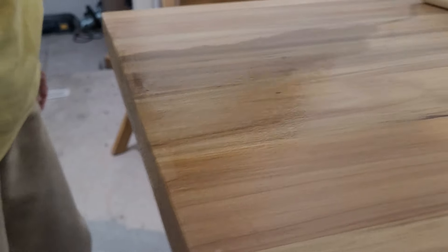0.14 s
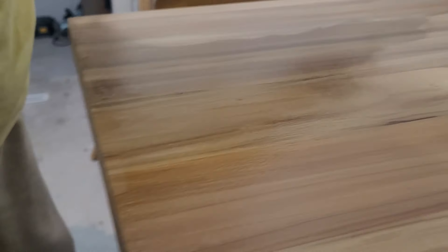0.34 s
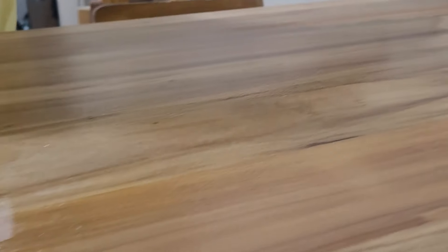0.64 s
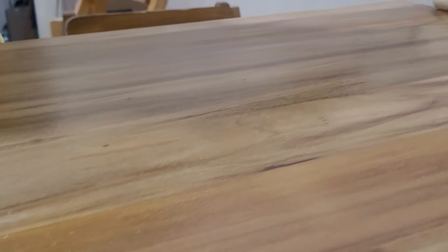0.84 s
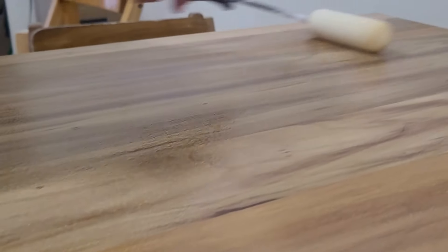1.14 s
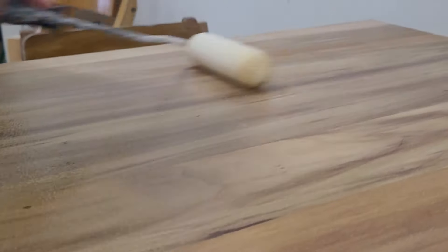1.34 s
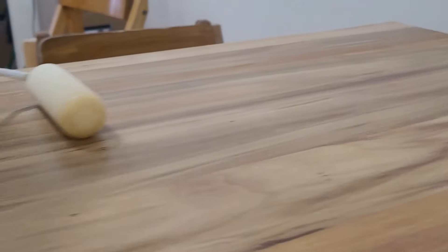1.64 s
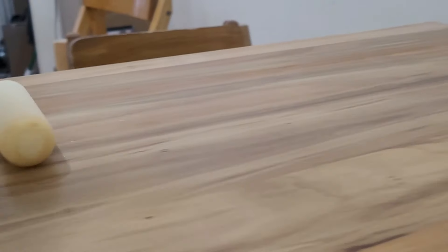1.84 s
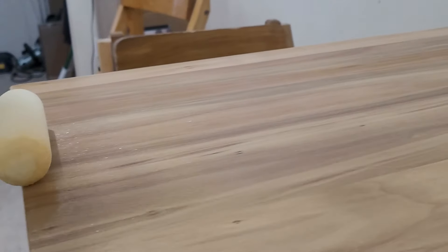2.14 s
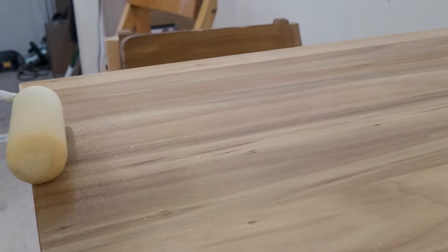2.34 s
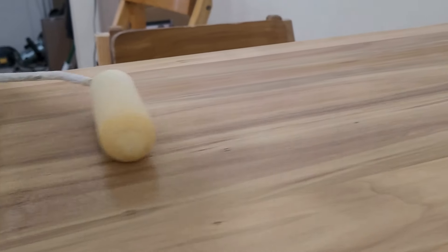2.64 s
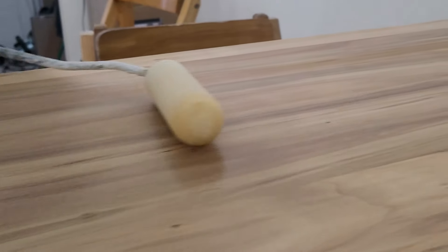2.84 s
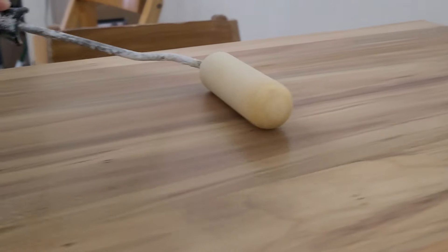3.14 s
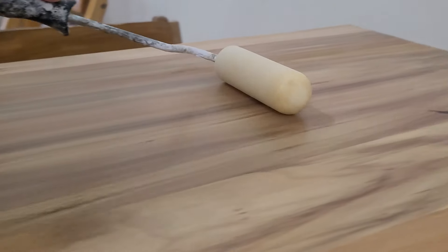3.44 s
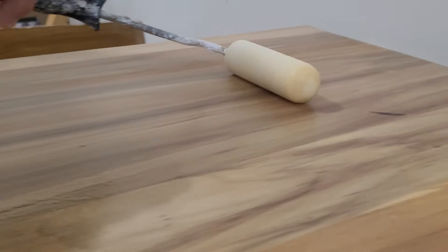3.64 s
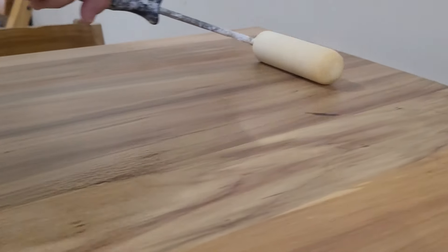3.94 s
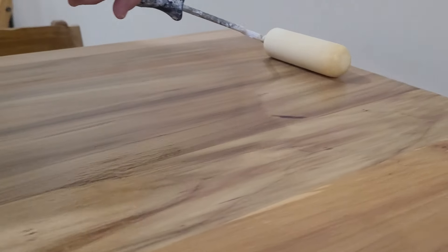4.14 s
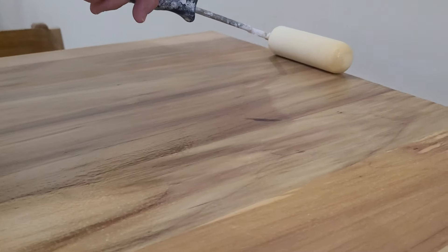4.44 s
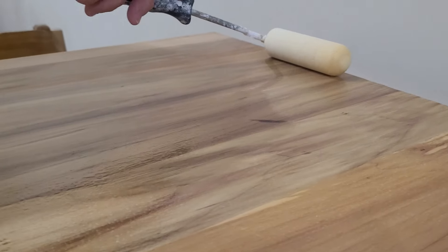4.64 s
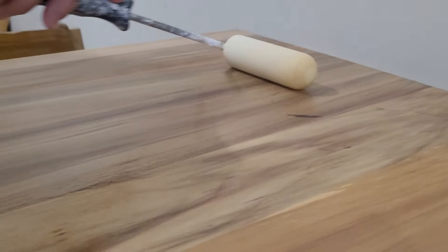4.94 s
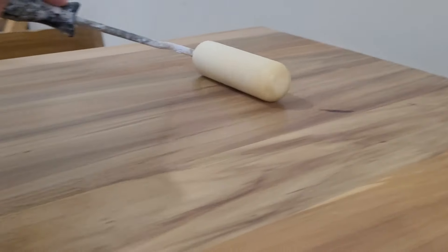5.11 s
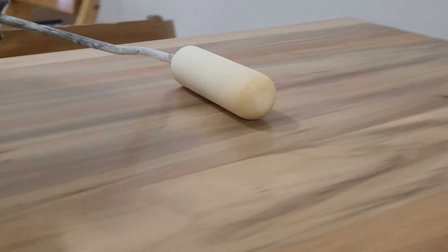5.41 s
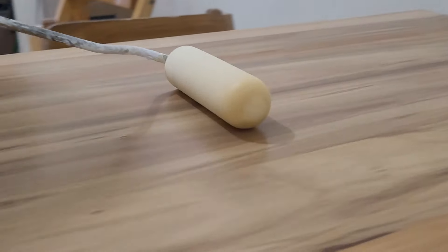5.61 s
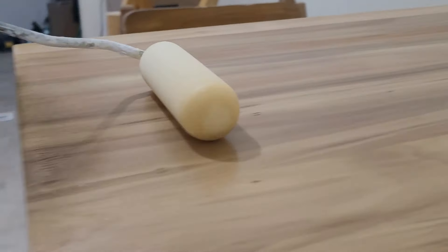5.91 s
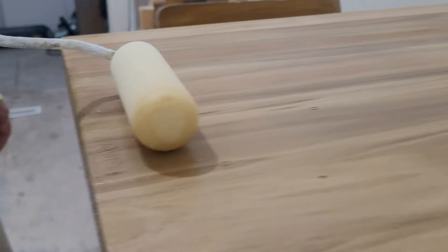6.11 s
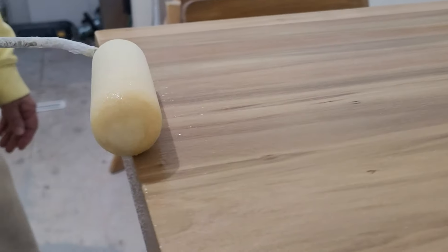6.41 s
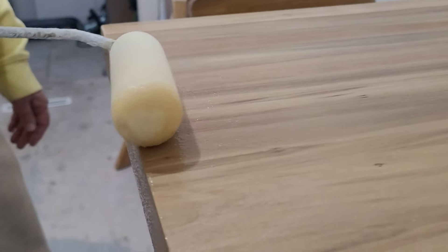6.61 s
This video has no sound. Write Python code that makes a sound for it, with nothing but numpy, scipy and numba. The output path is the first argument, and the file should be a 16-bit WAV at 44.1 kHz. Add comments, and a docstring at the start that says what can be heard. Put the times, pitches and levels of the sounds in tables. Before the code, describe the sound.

Long, crisp, tacky hissing strokes of a roller on a varnished tabletop, soft wood rumble beneath, after a loud finger thump on the microphone.

```python
"""Foam roller on wet finish

A foam roller is pushed to and fro over wet finish on a wooden table in a quiet workshop.
The tacky film tears behind it in tiny snaps: random clicks and hiss, coloured by filters.
The table rumbles softly (noise through resonances) and a shoe scuffs twice (broad noise).
The hand-held recorder faces the work with its right port; air moves over both ports in low noise.
Fingers shade the left port and rub across it: lumpy low noise, grit and ticks."""
import sys
import numpy as np
from scipy import signal
from scipy.fft import rfft, irfft, next_fast_len
from scipy.io import wavfile
from numba import njit

SR = 44100
rng = np.random.default_rng(int(sys.argv[2]) if len(sys.argv) > 2 else 0)


def file_out(sig):
    """Save sig as 16-bit WAV at sys.argv[1]."""
    # one column per channel
    cols = np.atleast_2d(sig).T
    # limit, then scale
    lim = np.clip(cols, -1, 1)
    pcm = np.round(lim * 32767).astype(np.int16)
    wavfile.write(sys.argv[1], SR, pcm)


N = 298557


def amp(db):
    """Turns a level in dB into a gain."""
    return 10 ** (np.asarray(db) / 20)


def rms_one(x):
    """Scales x to an rms (average strength) of 1."""
    return x / np.sqrt(np.mean(x ** 2) + 1e-20)


def curve(hz, points):
    """Reads a (pitch_hz, level_db) curve along a logarithmic pitch scale; very faint below its first point."""
    pitch_hz, level_db = np.array(points).T
    return np.interp(np.log(hz), np.log(pitch_hz), level_db, left=-140)


def shaped(points):
    """Noise whose power at each pitch follows (pitch_hz, db_per_hz) points."""
    hz = np.maximum(np.arange(N // 2 + 1) * SR / N, 1)
    spectrum = rfft(rng.standard_normal(N)) * amp(curve(hz, points))
    return irfft(spectrum, N) * np.sqrt(SR / 2)


def coloured(x, points):
    """Filters x to follow (pitch_hz, gain_db) points, without sounding early (minimum phase)."""
    size = next_fast_len(N + 8192)
    hz = np.maximum(np.arange(size // 2 + 1) * SR / size, 1)
    pitch_hz, gain_db = np.array(points).T
    log_gain = np.log(amp(np.interp(np.log(hz), np.log(pitch_hz), gain_db)))
    # folding the cepstrum onto positive times makes the filter causal
    cepstrum = irfft(log_gain, size)
    cepstrum[1:size // 2] *= 2
    cepstrum[size // 2 + 1:] = 0
    response = np.exp(rfft(cepstrum))
    return irfft(rfft(x, size) * response, size)[:N]


def drift(rate):
    """Slow random wandering, about rate changes a second, with spread 1."""
    # made at a twentieth of the sample rate; the first 4000 values let the filter settle
    r = np.exp(-40 * np.pi * rate / SR)
    slow = signal.lfilter([1], [1, -2 * r, r * r], rng.standard_normal(N // 20 + 4002))[4000:]
    return np.interp(np.arange(N) / 20, np.arange(len(slow)), rms_one(slow))


def resonate(x, modes):
    """Side-by-side resonances, each passed twice so that the valleys between them stay dark."""
    out = 0
    for k, (hz, width_hz, level_db) in enumerate(modes):
        r = np.exp(-np.pi * width_hz / SR)
        b = (1 - r * r) / 2 * np.array([1, 0, -1])
        a = [1, -2 * r * np.cos(2 * np.pi * hz / SR), r * r]
        once = signal.lfilter(b, a, x + 1e-18)
        out = out + (-1) ** k * amp(level_db) * signal.lfilter(b, a, once)
    return out


def grains(per_s, spread_db):
    """Random clicks of uneven size; their power is the same at any rate."""
    share = np.clip(per_s / SR, 1e-4, 1)
    sizes = amp(spread_db * np.minimum(rng.exponential(1, N), 3.5)) * rng.standard_normal(N)
    happens = rng.random(N) < share
    return rms_one(sizes * happens / np.sqrt(share))


def struck(events):
    """One single-sample click for each (start_s, level_db) row."""
    clicks = np.zeros(N)
    clicks[[round(s * SR) for s, db in events]] = amp(np.array(events)[:, 1])
    return clicks


def peak_db(s, db, rise, fall, hold=0):
    """Level in dB that climbs to db at s, holds and falls, at rates in dB a second."""
    t = np.arange(N) / SR
    return db - rise * np.maximum(s - t, 0) - fall * np.maximum(t - s - hold, 0)


def loudest(rows):
    """For each moment, the row whose first entry is highest."""
    rows = np.array([np.broadcast_arrays(*row) for row in rows])
    winner = rows[:, 0].argmax(axis=0)
    return np.take_along_axis(rows, winner[None, None], axis=0)[0]


def blended(rows):
    """Summed level in dB of (dB, ..) rows, with the other entries averaged by power."""
    rows = np.array([np.broadcast_arrays(*row) for row in rows])
    power = amp(2 * rows[:, :1])
    total = power.sum(axis=0)
    return 10 * np.log10(total[0]), *((power * rows[:, 1:]).sum(axis=0) / total)


# quiet of the room and electronics at each port: pitch_hz, level_db (dB per Hz)
ROOM_LEFT_NOISE = [(95, -93), (124, -77.5), (160, -92), (400, -101), (900, -108), (2000, -113),
                   (5000, -116), (8200, -121), (10500, -115), (16000, -113)]
ROOM_RIGHT_NOISE = [(95, -96), (124, -85), (160, -93), (400, -99), (900, -106), (1500, -110), (2800, -115),
                    (4500, -114), (6500, -106), (8000, -114), (16000, -113)]


def room():
    """Steady noise of room and electronics, separate in each port."""
    return np.array([shaped(ROOM_LEFT_NOISE), shaped(ROOM_RIGHT_NOISE)])


# tone of the air noise: pitch_hz, relative level_db (dB per Hz)
AIR_TONE = [(20, -12.5), (50, 6), (110, -2.5), (170, -14.5), (300, -18), (450, -34.5), (800, -48)]
# gusts of air and hand tremor: centre_s, half_width_s (to 1/e of the gain), left_db, right_db
AIR_GUSTS = [(.2, 0.05, -56.5, -65), (.35, 0.035, -28.5, -54), (.86, 0.063, -50, -68),
             (1.142, .05, -54, -53), (1.3, 0.074, -45.5, -50), (1.76, 0.05, -54, -49),
             (2.0, 0.11, -41.5, -57), (2.2, 0.14, -45.5, -55.5), (2.58, 0.061, -49, -55),
             (2.751, .08, -43, -52), (3.08, .07, -47.5, -55.5), (3.28, 0.031, -53, -62.5),
             (3.568, 0.08, -46.5, -51), (3.85, .13, -54.5, -60.5), (4.499, 0.085, -55, -60),
             (4.74, .06, -53, -55), (5.05, 0.21, -58, -54), (5.569, 0.063, -46.5, -45.5),
             (5.72, 0.077, -52.5, -48.5), (5.92, 0.056, -53, -51.5), (6.24, 0.052, -56.5, -61.5),
             (6.75, 0.11, -61, -60)]
CALM_DB, CALM_SWAY_DB = (-57, -61.5), -2.03   # left and right between gusts; size of their slow sway


def buffet():
    """Air and hand tremor make lumpy low noise, partly shared by the two ports."""
    both, t = shaped(AIR_TONE), np.arange(N) / SR
    lumps = [rms_one((1.6 * both + shaped(AIR_TONE)) * amp(2.3 * drift(29))) for port in range(2)]
    calm = np.array([amp(db + CALM_SWAY_DB * drift(3.3)) for db in CALM_DB])
    gusts = 0
    for centre_s, half_width_s, *port_dbs in AIR_GUSTS:
        swell = np.exp(-((t - centre_s) / half_width_s) ** 2)
        gusts = gusts + np.outer(amp(port_dbs), swell)
    return (calm + gusts) * lumps


# strokes of the roller; the second row is the faint fizz of the wet film while the roller is lifted:
# start_s, end_s, speed_up_s, slow_down_s, tearing_db, finest_db (relative),
# left_db (left port relative to right), table_db, then the falls along the row: tearing_db_per_s,
# finest_db_per_s, table_db_per_s, then larger strands: start_db (relative), change_db_per_s.
# The larger strands are stronger near the recorder. Levels are those at full speed (fizz: fully risen).
ROLLER_STROKES_AND_FIZZ = [(-0.6, 0.26, 0.12, 0.067, -43.5, 0.5, -16.5, -60.5, 0, 0.075, 6.5, 1.5, -1),
                           (0.15, 1.4, 0.039, .03, -57, -17, -22, -75, -1, 0.59, 0, 2, 0),
                           (1.24, 2.21, 0.13, 0.31, -37, -3.5, -17.5, -56.5, 4, 1, 7.5, -4, 6.5),
                           (2.2, 4.472, .3, .4, -40.5, -3.5, -14, -62, 0.74, -1.4, 4.5, 1.5, 0),
                           (4.52, 6.343, 0.31, 0.17, -38.5, -1, -18.5, -61, 2.5, 0.98, 2, -6, 4),
                           (6.46, 9.7, .2, 0.22, -46.5, -3.5, -12.5, -59, -1, 0, 18, 0.5, 4)]
# short peels, the foam touching or leaving the film: peak_s, tearing_db, finest_db (relative),
# rise_db_per_s, fall_db_per_s, table_db
FILM_PEELS = [(0.169, -42.5, -2, 200, 247.5, -76), (0.274, -49.5, -12.5, 300, 120, -59),
              (0.364, -46, -2, 250, 179.5, -83.5), (1.01, -48, -2.5, 400, 89, -72),
              (1.152, -42.5, 0, 1200, 110.5, -58.5), (1.29, -42, 0.5, 800, 60, -59.5),
              (2.15, -59, -21, 100, 121, -78.5), (2.245, -51, -9, 350, 32.5, -73),
              (4.535, -57.5, -3, 500, 41, -82), (4.724, -48, -9.5, 150, 81, -84.5),
              (4.873, -45.5, -3.5, 100, 125.5, -66), (6.286, -51.5, -3, 200, 197.5, -69),
              (6.49, -57, -9.5, 900, 29, -81)]
EASE_POWER = 1.5   # above 1 the hand starts and stops gently
TEAR_POWER, TABLE_POWER = 1.23, 3.5   # loudness grows as these powers of the speed
SLOW_TOP_DB, SLOW_LEFT_DB = -5, -6   # at a crawl: weaker finest strands, less at the left port
PEEL_LEFT_DB, PEEL_LARGE_DB = -20.5, -2.5   # left port relative to right; larger strands (relative)


def rolling():
    """Stroke speeds, the fizz and the peels set the levels of tearing, finest, left, larger and table."""
    t, rows, boards = np.arange(N) / SR, [], 0
    for row in ROLLER_STROKES_AND_FIZZ:
        start, end, up, down, db, top_db, left_db, table_db, *changes = row
        sag, top_sag, table_sag, large_db, large_change = changes
        since, until = np.maximum(t - start, 0), np.maximum(end - t, 0)
        starting = 1 - np.exp(-(since / up) ** EASE_POWER)
        stopping = 1 - np.exp(-(until / down) ** EASE_POWER)
        speed = starting * stopping + 1e-4   # about 1 at full speed; for the fizz only a fade in and out
        tear_db = db - sag * since + TEAR_POWER * 20 * np.log10(speed)
        finest_db = top_db - top_sag * since + SLOW_TOP_DB * (1 - speed)
        shade_db = left_db + SLOW_LEFT_DB * (1 - speed)
        rows.append((tear_db, finest_db, shade_db, large_db + large_change * since))
        boards = boards + amp(table_db - table_sag * since) * speed ** TABLE_POWER
    for s, db, top_db, rise, fall, table_db in FILM_PEELS:
        shape_db = peak_db(s, 0, rise, fall)
        rows.append((db + shape_db, top_db, PEEL_LEFT_DB, PEEL_LARGE_DB))
        boards = boards + amp(table_db + shape_db)
    return (*blended(rows), boards)


SKIRT_HZ, TOP_HZ = 4930, 8540   # below: larger strands; above: the finest ones


def thirds(x):
    """Low skirt, centre and top of x; they add up to x."""
    hz, spectrum = np.arange(N // 2 + 1) * SR / N, rfft(x)
    skirt = irfft(spectrum / (1 + (hz / SKIRT_HZ) ** 12), N)
    top = irfft(spectrum / (1 + (TOP_HZ / (hz + 1)) ** 12), N)
    return skirt, x - skirt - top, top


# single strands of finish breaking: start_s, level_db (relative)
STRAND_SNAPS = [(1.2811, -29), (2.0758, -38), (2.212, -49.5), (2.225, -48), (2.2465, -46), (2.3193, -39),
                (4.331, -43.5), (4.3572, -38), (4.5103, -49), (4.5303, -45.5), (4.5417, -45.5),
                (4.6211, -43.5), (4.6425, -34), (4.7059, -38), (4.7348, -25.5), (4.865, -22), (6.1985, -26),
                (6.2698, -42), (6.3017, -40), (6.4853, -54), (6.5093, -44), (6.5222, -43.5), (6.5397, -46)]
# colour of a snap at each port; the shaded left port has a deep notch: pitch_hz, gain_db (relative)
RIGHT_PORT_COLOUR = [(1500, -25.5), (2500, -22.5), (3200, -14.5), (3800, -8.5), (5000, -5), (6200, 1.5),
                     (7000, -1), (8000, -11), (8800, -15), (10000, -13.5), (11800, -10), (13000, -12),
                     (14000, -16), (16000, -21.5)]
LEFT_PORT_COLOUR = [(1500, -20.5), (3000, -12), (3500, -12), (4000, -1.5), (5200, -0.5), (6500, 1),
                    (7000, -6.5), (7500, -36.5), (8200, -35.5), (9000, -19), (9700, -9.5), (11500, -12.5),
                    (13000, -19), (16000, -31.5)]


def tearing(level_db, top_db, left_db, large_db):
    """Louder tearing has more and larger strands: faint moments crackle thinly, strong ones hiss broadly."""
    pace = amp(1.1 * (level_db + 42))   # judged from the tearing level
    hiss = np.clip(0.27 + 0.22 * pace, 0, .9)   # share of power in strands too fine to tell apart
    snaps = grains(900 + 6000 * pace, spread_db=2.3)
    direct = np.sqrt(1 - hiss) * snaps + np.sqrt(hiss) * rng.standard_normal(N)
    shaded = .25 * direct + rng.standard_normal(N)   # the left port hears mostly the walls
    flutter = amp(level_db + .8 * drift(10) + .5 * drift(5.1))
    ports = []
    for x, colour, gain in ((shaded, LEFT_PORT_COLOUR, amp(left_db)), (direct, RIGHT_PORT_COLOUR, 1)):
        skirt, centre, top = thirds(rms_one(coloured(x, colour)))
        larger = pace ** 0.51 * amp(large_db + 0.71 * drift(9.6)) * skirt
        finest = amp(top_db + 6.5 + 0.72 * drift(3.1)) * top
        ports.append(flutter * gain * (larger + centre + finest))
    # the single strands are heard at the right port only
    skirt, centre, top = thirds(coloured(amp(16) * struck(STRAND_SNAPS), RIGHT_PORT_COLOUR))
    ports[1] = ports[1] + 0.11 * skirt + centre + 0.78 * top
    return np.array(ports)


def spread(x, other, left_db, alike):
    """Right gets x; left gets a quieter, partly unrelated copy."""
    alike = np.clip(alike, 0, 1)
    left = alike * x + np.sqrt(1 - alike ** 2) * other
    return np.array([amp(left_db) * left, x])


# resonances of the table top: pitch_hz, width_hz (of one filter pass), level_db (relative)
TABLE_MODES = [(149.6, 24, 4), (304, 480, 5.5), (958.4, 250, 4.5), (1184, 200, 2), (1378.4, 320, 0),
               (2183, 850, -6.5)]


def table(level):
    """The rolling foam shakes the boards; each resonance swells and fades as the roller moves along."""
    out = 0
    for mode in TABLE_MODES:
        near, far = (resonate(rng.standard_normal(N), [mode]) for side in range(2))
        out = out + amp(2.5 * drift(5)) * spread(near, far, left_db=-1.5, alike=.45)
    return level * rms_one(out)


# fingers rubbing the left port: pressed_s, level_db, rise_db_per_s, held_s, easing_s, lump_pitch_hz,
# pitch_sag_octaves_per_s, grit_db (relative to the rub), grit_held_s
FINGER_RUBS = [(0.264, -0.5, 3800, .04, .05, 330, 2, -3.5, 0.011),
               (0.667, -14.5, 3997.5, .043, .043, 170, 1, -22, .055),
               (2.003, -29.5, 421, .014, .012, 141.4, 42, -25, 0.0032),
               (2.15, -28.5, 1801, .024, .03, 276.3, 35, -25.5, 0.03),
               (3.072, -42.5, 1499.5, .045, .02, 110.8, 5, -17, .045),
               (5.78, -51.5, 600, .035, .045, 198.6, 5, -10.5, 0.044)]
EASE_DB_PER_S, LIFT_DB_PER_S = 550.5, 1400.5   # fall after the hold; extra fall once the finger lifts
GRIT_FADE_DB_PER_S = 551
GRIT_LATE_S = .006   # skin starts to slip just after the press


def touching():
    """Pressure dB, lump pitch and grit dB of the fingers: press, hold, ease off, lift."""
    t, rows = np.arange(N) / SR, []
    for s, db, rise, hold, ease, hz, sag, grit_db, grit_hold in FINGER_RUBS:
        lift_db = peak_db(s + hold + ease, 0, 0, LIFT_DB_PER_S)
        pressure_db = peak_db(s, db, rise, EASE_DB_PER_S, hold) + lift_db
        lump_hz = hz * 2 ** (-sag * np.maximum(t - s, 0))
        slip_db = peak_db(s + GRIT_LATE_S, db + grit_db, rise, GRIT_FADE_DB_PER_S, grit_hold)
        rows.append((pressure_db, lump_hz, slip_db))
    return loudest(rows)


@njit
def moving_low_pass(x, turn, damping):
    """Resonant two-pole low-pass whose corner follows turn (radians a sample)."""
    out, low, band = np.zeros_like(x), 0.0, 0.0
    for i in range(len(x)):
        band += turn[i] * (x[i] - low - damping * band)
        low += turn[i] * band
        out[i] = low / np.sqrt(turn[i])
    return out


# colour of the skin's grit and ticks: pitch_hz, gain_db (relative)
GRIT_COLOUR = [(200, -6), (600, -3.5), (1500, -1.5), (3500, -14.5), (6500, -42), (7500, -49), (8800, -49.5),
               (10300, -33.5), (13000, -41.5), (16000, -42)]
# resonances of the recorder body: pitch_hz, width_hz (of one filter pass), level_db (relative)
CASE_MODES = [(250, 160, -7.5), (506, 67, -0.5), (1182.6, 470, -17.5)]
# the hand pushing the whole recorder: pitch_hz, width_hz (of one filter pass), level_db (relative)
THUMP_MODE = [(65.7, 20, 0)]
# skin letting go of the left port: start_s, level_db (relative)
SKIN_TICKS = [(.318, -31), (.341, -25), (.354, -20.5), (.357, -24), (.684, -38), (.737, -39),
              (1.967, -48.5), (2.172, -36), (5.762, -51.5), (5.777, -41), (5.786, -51), (5.8, -35),
              (5.824, -49)]


def fingers():
    """Skin pumps the air in the left port in lumps, with grit on top; a little passes through the case."""
    level_db, lump_hz, grit_db = touching()
    turn = 2 * np.pi * np.clip(lump_hz, 30, 2000) / SR
    firm = np.clip((level_db + 46.0) / 35, 0, 1)   # lighter touches are duller and catch less often
    high_pass = signal.butter(1, 90, "high", fs=SR, output="sos")
    push = signal.sosfilt(high_pass, rng.standard_normal(N))
    thump = rms_one(resonate(rng.standard_normal(N), THUMP_MODE))
    lumps = rms_one(moving_low_pass(push, turn, 0.94)) + amp(-1.0 - 7.4 * firm) * thump
    grit = rms_one(coloured(grains(1800 + 5000 * firm, spread_db=1.8), GRIT_COLOUR))
    dull = signal.sosfilt(signal.butter(2, 2500, fs=SR, output="sos"), grit)
    grit = dull + firm * (grit - dull)
    touch = amp(level_db)
    ticks = coloured(amp(23.0) * struck(SKIN_TICKS), GRIT_COLOUR)
    # the sound through the case levels off under a firm touch
    case = rms_one(resonate(rng.standard_normal(N), CASE_MODES)) * np.tanh(touch * 13.0) / 16.0
    return np.array([touch * lumps + amp(grit_db) * grit + ticks, amp(-30.0) * case])


# colour of a sole sliding on concrete at each port: pitch_hz, gain_db (relative)
SOLE_RIGHT_COLOUR = [(400, -19.5), (900, -4), (2000, -3.5), (3000, -2), (5600, 2), (7000, -0.5),
                     (8500, -14.5), (12000, -17.5), (16000, -29.5)]
SOLE_LEFT_COLOUR = [(400, -5), (1000, 1), (2300, 0), (3200, 2.5), (5500, -7.5), (6600, -12.5), (7500, -39),
                    (8500, -28), (10000, -18.5), (16000, -39)]
# the slides of the sole: peak_s, level_db (right port, without the tail), rise_db_per_s, fall_db_per_s
SHOE_SCUFFS = [(0.705, -38.5, 248, 208), (1.013, -40.5, 594, 162.5)]
SCUFF_TAIL_DB, SCUFF_TAIL_DB_PER_S = -17.5, 47   # the room rings on: level relative to the scuff, fall


def scuff():
    """Grit under a sliding sole: broad dense noise, duller at the left port."""
    left = rms_one(coloured(rng.standard_normal(N), SOLE_LEFT_COLOUR))
    right = rms_one(coloured(rng.standard_normal(N), SOLE_RIGHT_COLOUR))
    level = 0
    for s, db, rise, fall in SHOE_SCUFFS:
        slide = amp(peak_db(s, db, rise, fall))
        tail = amp(peak_db(s, db + SCUFF_TAIL_DB, rise, SCUFF_TAIL_DB_PER_S))
        level = level + slide + tail
    return level * np.array([amp(-11.0) * left, right])


def scene():
    """All sources added up at the left and right ports."""
    *tear, boards = rolling()
    return room() + buffet() + tearing(*tear) + table(boards) + fingers() + scuff()


CUTOFF_HZ = 15800   # the treble stops here


def record(dry):
    """The input stage overloads with a rounded knee; the top is cut."""
    clipped = .99 * dry / (1 + np.abs(dry) ** 10) ** (1 / 10)
    low_pass = signal.ellip(12, .3, 70, CUTOFF_HZ, fs=SR, output="sos")
    return signal.sosfilt(low_pass, clipped)


dry = scene()
out = record(dry)
file_out(out)
```